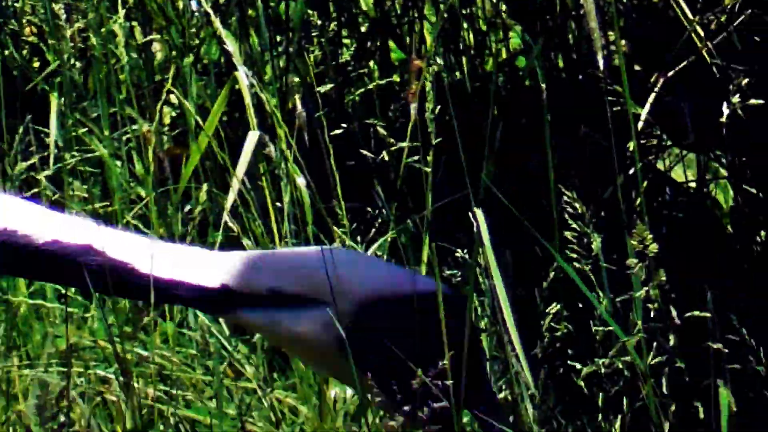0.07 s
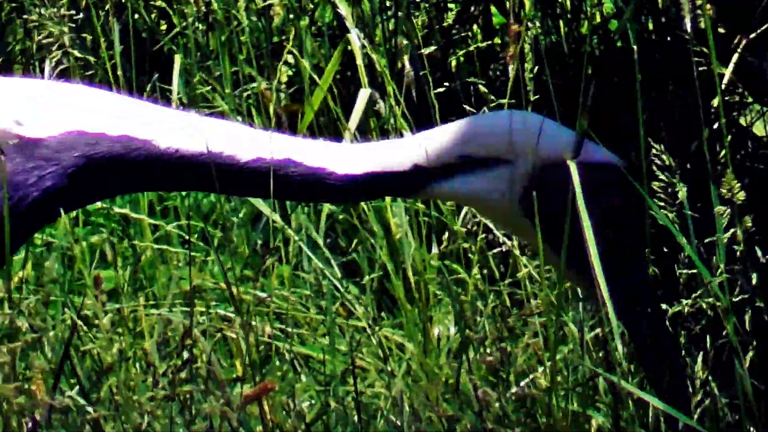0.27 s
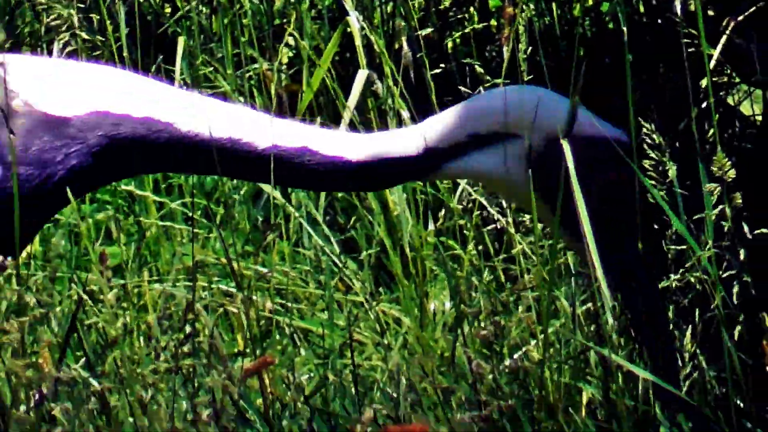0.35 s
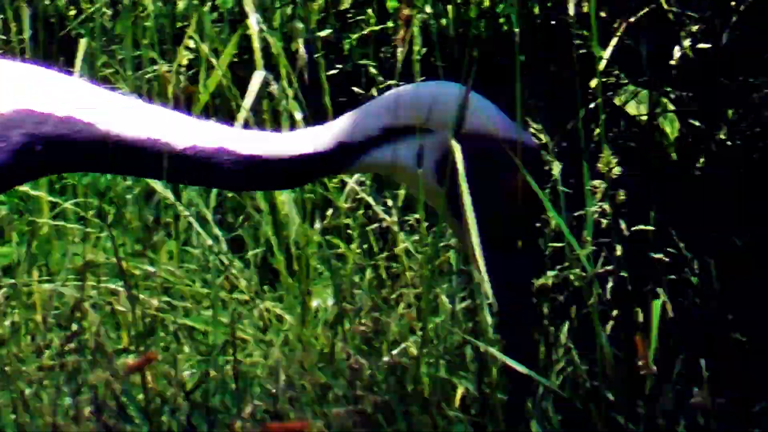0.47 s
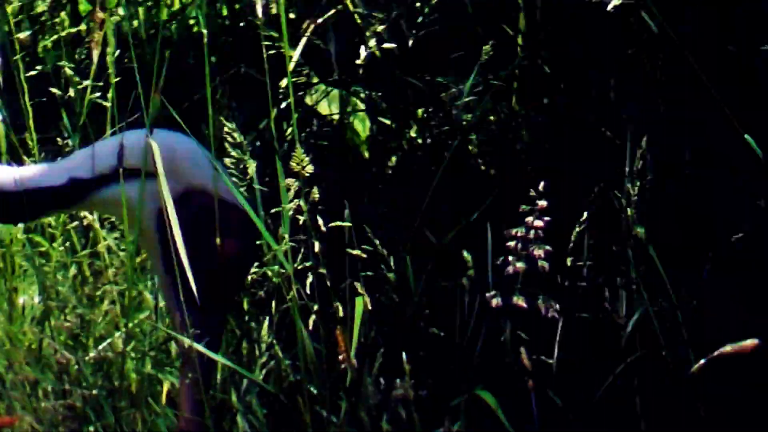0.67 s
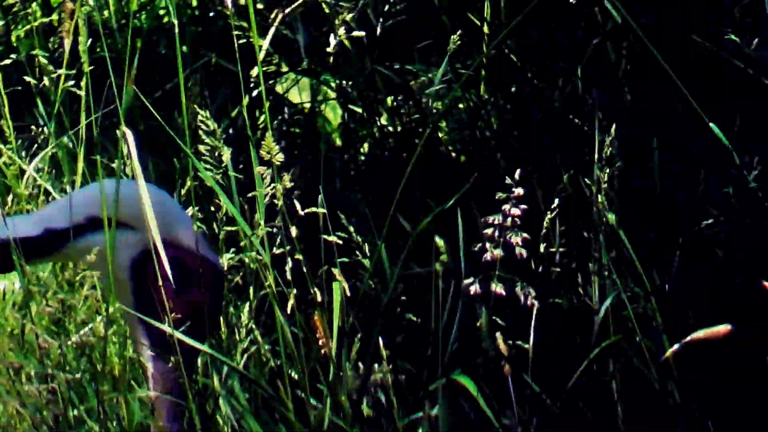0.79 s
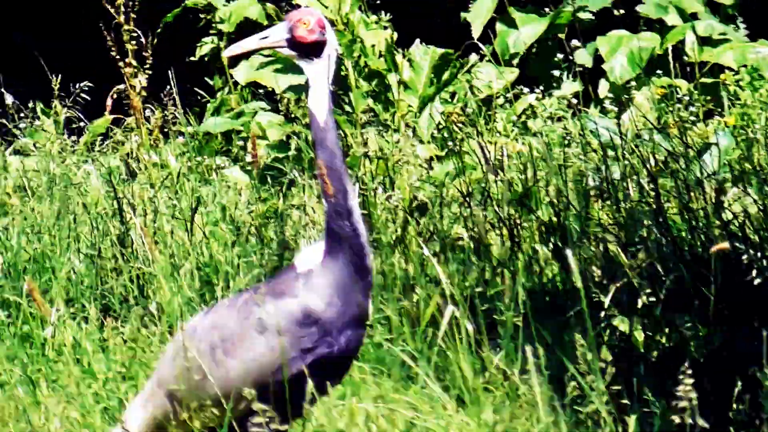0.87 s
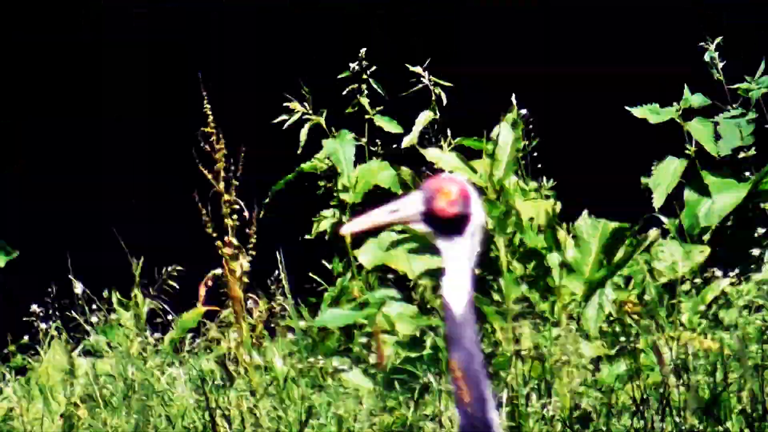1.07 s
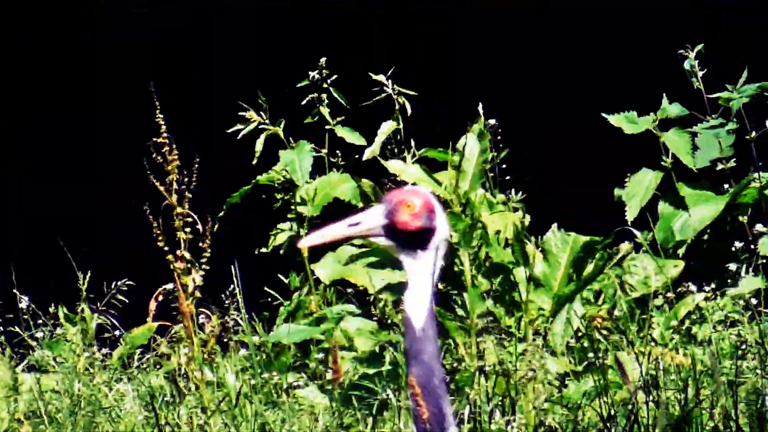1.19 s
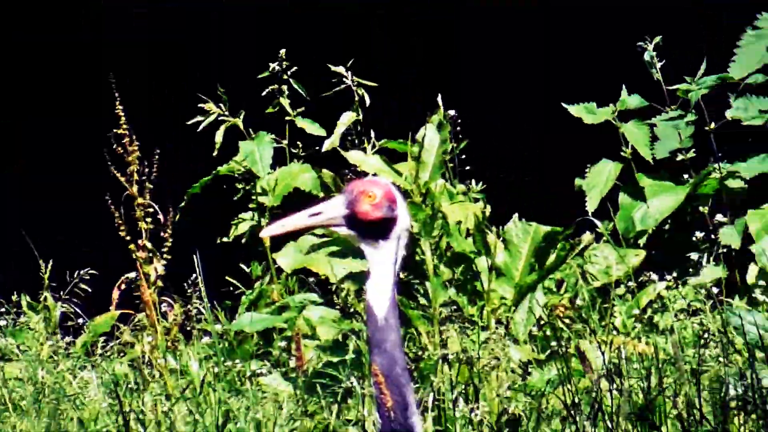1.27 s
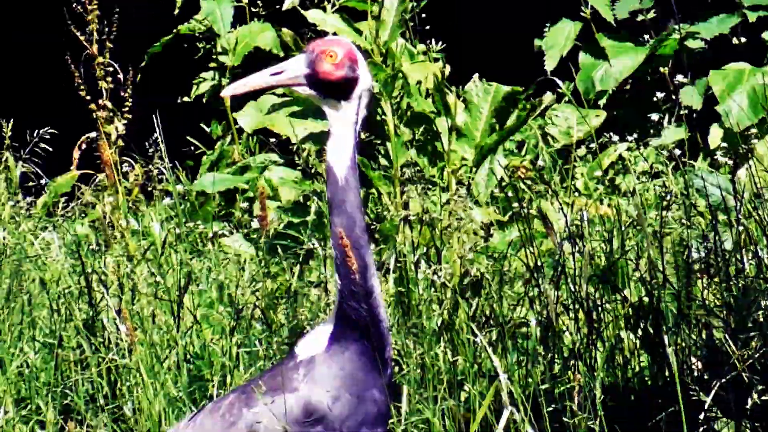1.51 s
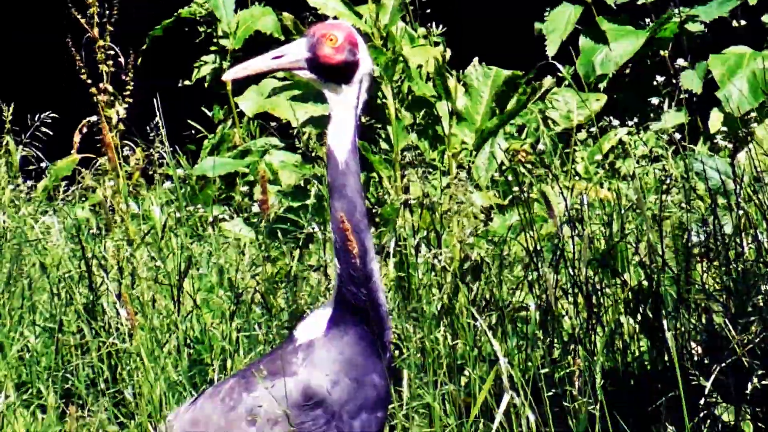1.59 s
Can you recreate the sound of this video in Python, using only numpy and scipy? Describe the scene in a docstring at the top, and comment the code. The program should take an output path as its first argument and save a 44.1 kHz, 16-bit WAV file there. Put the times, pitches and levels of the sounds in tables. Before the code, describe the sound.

A hand rubs on a camera body right at the microphone, a rough, hollow scraping with small plastic creaks, loudest from 0.2 to 0.5 seconds and gone by about 0.8. A very faint, thin lens motor whine then comes and goes, and distant birds chirp softly from 0.9 seconds on. A plastic control clicks once at 1.3 seconds. A steady, quiet meadow hush lies underneath throughout.

```python
"""A quiet meadow, where a hand shifts its grip on a camera. The skin sticks and slips over the housing,
which rings hollowly and creaks, and the rub dies away. A plastic control clicks once, and the lens
motor whines faintly in thin bands of noise. Distant birds chirp in short glides, smeared by the trees,
over a steady outdoor hush."""
import sys
import numpy as np
from scipy import signal
from scipy.fft import rfft, irfft
from scipy.io import wavfile
from scipy.ndimage import uniform_filter1d

SR = 44100
rng = np.random.default_rng(int(sys.argv[2]) if len(sys.argv) > 2 else 0)


def waveform_to_disk(signal):
    """Save audio, clipped to [-1, 1], as 16-bit WAV at the path in sys.argv[1]."""
    frames = np.transpose(np.atleast_2d(signal))
    scaled = np.clip(frames, -1, 1) * 32767
    samples = np.round(scaled).astype(np.int16)
    wavfile.write(sys.argv[1], SR, samples)


N = 72765

# slips of the grip: start_s, knock_db, chatter_hz, scratch_db
GRIP_SLIPS = [(.054, -19, 1500, -20), (.1675, -16.5, 687, -38), (.209, -10.5, 766, -18.5),
              (.229, -2, 560, -10.5), (.237, -2, 586, -10), (.2655, -9, 740, -26), (0.2705, 1, 950, 1.5),
              (.278, -1.5, 655, -11), (.301, -6, 634, -23), (.3115, -3.5, 618, -7), (.321, 1.5, 853, -4.5),
              (.3535, -0.5, 630, -7), (.3613, -3.5, 720, -1.5), (.3895, 1.5, 764, -3), (.3953, 0, 783, 4),
              (.4035, 4, 761, 1.5), (.409, -32, 700, -23), (.421, -22, 707, -14), (.438, -9, 745, -5),
              (.449, -9, 620, -14), (.4635, -8.5, 710, -16)]
CHATTER_S, KNOCK_DB = 0.0053, -23.5
SCRATCH_DB, SCRATCH_RISE_S, SCRATCH_FALL_S = -32, 0.001, 0.0038
# fader moves of the slide: time_s, hollow_rub_db, hiss_db
SLIDE_LEVELS = [(.16, -91, -84), (.203, -62, -62), (.218, -30.5, -48), (.29, -32, -44.5), (.38, -30.5, -42),
                (.41, -32, -35), (.47, -30.5, -41), (.55, -41.5, -51), (.63, -44, -56), (.73, -49.5, -57),
                (.85, -56.5, -69)]
GRAINS_PER_S, GRAIN_SPREAD_DB = 2500, 1
THRUM_HZ, THRUM_WAVER_HZ, THRUM_DB, THRUM_PEAK_S, THRUM_SWELL_S = 237, 5, -44.5, 0.355, 0.11
# hollow ring of the housing: pitch_hz, t60_s, level_db, drift_db_per_s
HOUSING_MODES = [(564.6, 0.24, -5, -50), (584, 0.12, -6.5, -31), (693.4, .11, -3.5, -22),
                 (713.5, 0.15, -6, 26), (778.4, 0.064, -8, 51), (708, 0.0072, 6.5, 24.5),
                 (876, 0.063, -8, 35), (980, 0.047, -19, -33), (1267, 0.09, -15, -6), (1426, 0.029, -14, 9)]
GRIP_MID_S, CONTACT_BAND_HZ = 0.34, (441, 1420)
# EQ of the scratching skin: frequency_hz, gain_db
SCRATCH_EQ = [(100, -33), (350, -18), (600, 5.5), (1000, 9.5), (1430, 4), (1700, -12), (2250, 4.5),
              (2850, -7.5), (3600, 2), (4300, 4.5), (4800, -5), (5900, 0), (7200, -6), (8600, -5.5),
              (10000, -14.5), (12000, -14), (15500, -30)]
# creaks of the plastic under the grip: start_s, level_db
CREAK_HITS = [(.114, -22), (.2727, -7.5), (.3232, -9.5), (.3957, 4.5), (.4062, -5)]
CREAK_DB, CREAK_RISE_S, CREAK_FALL_S = -27.5, .00025, 0.001
# EQ of a creak: frequency_hz, gain_db
CREAK_EQ = [(200, -9), (800, 17), (1300, 12), (1700, -11), (4200, 6.5), (5000, -6), (6000, -1), (8700, -12),
            (10500, -4), (15500, -18)]
# touch and snap of the control: start_s, level_db
CLICK_HITS = [(1.3037, -12.5), (1.3065, -7.5), (1.3087, -0.5), (1.3114, -16)]
CLICK_DB, CLICK_RISE_S, CLICK_FALL_S = -21, 0.00013, 0.00077
# EQ of the control's crack: frequency_hz, gain_db
CLICK_EQ = [(300, -22), (650, -11), (880, 2), (1350, 1), (1700, -9), (2400, -6), (3400, -6), (4400, -3),
            (5000, -7), (6500, 2), (8000, 0), (9500, -4), (11000, -12), (13000, -14), (15500, -15)]
# ring after the click: pitch_hz, t60_s, level_db
CLICK_RING = [(905, 0.046, -25.5), (1080, 0.023, -43), (1286, 0.052, -30)]
# whines of the lens motor: start_s, end_s, pitch_hz, width_hz, level_db
MOTOR_WHINES = [(0.743, .96, 4990, 895, -68), (0.953, 1.32, 8040, 300, -67), (1.114, 1.332, 6220, 302, -64),
                (1.358, 1.65, 7970, 362, -67.5), (1.38, 1.68, 6100, 300, -62.5),
                (1.443, 1.516, 6140, 110, -56)]
WHINE_FADE_S, WHINE_FLUTTER_DB = 0.032, 2.5
# distant chirps: start_s, length_s, start_pitch_hz, end_pitch_hz, level_db
BIRD_CHIRPS = [(0.868, 0.029, 3630, 3620, -59), (0.895, 0.065, 3240, 3200, -62),
               (0.977, 0.025, 3320, 3500, -63.5), (1.24, 0.033, 3650, 3790, -57),
               (1.33, .05, 4300, 4240, -68), (1.354, 0.032, 3710, 3750, -61.5),
               (1.367, 0.035, 4200, 4030, -66), (1.39, 0.03, 3510, 3350, -67),
               (1.429, 0.0413, 3725, 3455, -56.5), (1.492, .035, 3350, 3765, -55.5),
               (1.521, 0.11, 4170, 4230, -62), (1.633, 0.042, 3670, 3720, -51.5)]
CHIRP_WAVER_HZ, TREES_T60_S = 113.6, 0.22
# EQ of the outdoor hush: frequency_hz, gain_db
HUSH_EQ = [(25, -6.5), (55, 1), (90, 7.5), (118, 1), (200, 2), (380, -1.5), (640, 0), (900, -8.5),
           (1200, -10.5), (1600, -20.5), (2200, -17.5), (2800, -22.5), (3700, -19), (4400, -24),
           (5050, -30.5), (6300, -23.5), (7600, -23.5), (8800, -27.5), (12000, -29), (15500, -29)]
HUSH_DB, HUSH_WAVER_DB, HUSH_BASS_HZ = -43.5, 1, 680
# stereo image of the hush: frequency_hz, left_over_right_db, correlation
HUSH_IMAGE = [(60.3, -8.5, 0.25), (194, -5.5, .05), (363, -8, 0.35), (650, -1, 0.39), (1400, -1, 0.68),
              (3100, 0.5, 0.86), (6500, 0, 0.89), (14900, 0.5, 0.11)]
# the housing shakes the two microphones unequally: frequency_hz, left_over_right_db, left_lead_rad
HOUSING_IMAGE = [(60, -5, 2.4), (245, -12, 2.1), (527, -4.5, 1.97), (700, -4.5, 1.16), (1340, -1, 1.4),
                 (2420, 0.5, 0.53), (4460, -0.5, 0.13), (9000, 1, 0.11), (15000, 0, 0.4)]
# stereo width of scratches, creaks and clicks: frequency_hz, side_gain_db
SIDE_EQ = [(1000, -11), (4500, -15.5), (6500, -26), (9000, -2.5), (14000, -6)]
HIGH_CUT_HZ = 15900


def grip():
    """Slips and sliding grains ring the housing and scratch its surface."""
    body_gain = np.sqrt(np.sum(housing(taps([(GRIP_MID_S, 0)])) ** 2))
    rub = grains() * undb(curve(SLIDE_LEVELS, axis=1)) / body_gain
    slip_hits = taps([(start, db) for start, _, _, db in GRIP_SLIPS])
    scrapes = undb(SCRATCH_DB) * ring(slip_hits, burst(SCRATCH_RISE_S, SCRATCH_FALL_S))
    friction = np.hypot(scrapes, undb(curve(SLIDE_LEVELS, axis=2)))
    scratch, side = colour(np.array([grains(), grains()]) * friction, SCRATCH_EQ)
    return through_housing(housing(chatter() + rub) + thrum() + scratch) + widen(side)


def chatter():
    """In each slip the skin catches a few times in quick succession, swelling and letting go."""
    t, force = clock(), 0
    for start, db, hz, _ in GRIP_SLIPS:
        swell = np.sin(np.pi * np.clip((t - start) / CHATTER_S, 0, 1)) ** 2
        catches = np.cos(2 * np.pi * hz * (t - start))
        force = force + undb(KNOCK_DB + db) * 2 * swell / swell.sum() * catches
    return force


def grains():
    """Sliding skin makes dense tiny catches of uneven size."""
    caught = rng.random(N) < GRAINS_PER_S / SR
    polarity = np.sign(rng.standard_normal(N))
    size = undb(GRAIN_SPREAD_DB * np.minimum(rng.exponential(size=N), np.pi))
    return unit(caught * polarity * size)


def housing(force):
    """Soft skin drives the hollow modes; their mix changes as the grip moves along."""
    push = signal.sosfilt(signal.butter(2, CONTACT_BAND_HZ, "bandpass", fs=SR, output="sos"), force)
    moved_s, out = np.clip(clock() - GRIP_MID_S, -.2, .2), 0
    for hz, t60, db, drift in HOUSING_MODES:
        pole = np.exp((2j * np.pi * hz - np.log(1000) / t60) / SR)
        out = out + signal.lfilter([1], [1, -pole], push * undb(db + drift * moved_s)).imag
    return out


def thrum():
    """The whole body hums a low wavering note that swells and fades with the slide."""
    hz = THRUM_HZ + THRUM_WAVER_HZ * walk(56.3)
    swell = np.exp(-((clock() - THRUM_PEAK_S) / THRUM_SWELL_S) ** 2)
    level = undb(THRUM_DB + 2.2 * walk(30.5)) * swell
    return level * np.sqrt(2) * np.sin(2 * np.pi * np.cumsum(hz) / SR)


def creaks():
    """The plastic shell gives short bright snaps under the grip."""
    stress = undb(CREAK_DB) * ring(taps(CREAK_HITS), burst(CREAK_RISE_S, CREAK_FALL_S))
    snap, side = colour(np.sign(rng.standard_normal((2, N))) * stress, CREAK_EQ)
    return through_housing(snap) + widen(side)


def click():
    """A small plastic control is touched, snaps and settles."""
    force = taps(CLICK_HITS)
    contact = np.sign(rng.standard_normal((2, N))) * ring(force, burst(CLICK_RISE_S, CLICK_FALL_S))
    crack, side = undb(CLICK_DB) * colour(contact, CLICK_EQ)
    return through_housing(crack + ring(force, ringing(CLICK_RING))) + widen(side)


def lens_motor():
    """The motor's thin whines come and go, each a fluttering band of noise."""
    t, out = clock(), 0
    for start, end, hz, width, db in MOTOR_WHINES:
        gate = np.clip(np.minimum(t - start, end - t) / WHINE_FADE_S, 0, 1)
        level = undb(db + WHINE_FLUTTER_DB * walk(35.16)) * gate
        phase = 2 * np.pi * hz * t
        out = out + level * (walk(width) * np.cos(phase) + walk(width) * np.sin(phase))
    return out


def birds():
    """Short wavering glides, smeared by an equally loud echo from the trees."""
    t, song = clock(), 0
    for start, length, start_hz, end_hz, db in BIRD_CHIRPS:
        along = np.clip((t - start) / length, 0, 1)
        hz = start_hz + (end_hz - start_hz) * along + CHIRP_WAVER_HZ * walk(500)
        swell = np.sqrt(2 * np.abs(np.sin(np.pi * along)))
        song = song + undb(db) * swell * np.sin(2 * np.pi * np.cumsum(hz) / SR)
    trees = rng.standard_normal(N) * np.exp(-np.log(1000) * t / TREES_T60_S)
    return song + ring(song, trees / np.sqrt(np.sum(trees ** 2)))


def hush():
    """A steady bed of outdoor air: the treble is smooth, the bass wavers and leans right."""
    alike = np.clip(per_bin(HUSH_IMAGE, axis=2), -1, 1)
    pan = undb(per_bin(HUSH_IMAGE, axis=1) / 2)
    mid, side = (filtered(rng.standard_normal(N), np.sqrt(1 + sign * alike)) for sign in (1, -1))
    stereo = filtered(np.array([mid + side, mid - side]), np.array([pan, 1 / pan]))
    air = unit(colour(stereo, HUSH_EQ))
    bass = signal.sosfiltfilt(signal.butter(2, HUSH_BASS_HZ, fs=SR, output="sos"), air)
    return undb(HUSH_DB) * (air - bass + bass * undb(HUSH_WAVER_DB * walk(25.15)))


def through_housing(x):
    """The housing carries sound to the two microphones with different level and phase."""
    left = undb(per_bin(HOUSING_IMAGE, axis=1) / 2) * np.exp(.5j * per_bin(HOUSING_IMAGE, axis=2))
    return filtered(x, np.array([left, 1 / left]))


def widen(x):
    """A side signal for width, in opposite polarity left and right."""
    side = filtered(x, undb(per_bin(SIDE_EQ)))
    return np.array([side, -side])


def undb(db):
    """Decibels to gain."""
    return 10 ** (np.asarray(db) / 20)


def unit(x):
    """Scale to rms 1."""
    return x / np.sqrt(np.mean(x ** 2) + 1e-20)


def clock():
    """Time of every sample in seconds."""
    return np.arange(N) / SR


def curve(table, axis=1):
    """One column of a table as straight ramps in time."""
    rows = np.array(table)
    return np.interp(clock(), rows[:, 0], rows[:, axis])


def per_bin(table, axis=1):
    """One column of a table as straight ramps over log frequency."""
    rows = np.array(table)
    hz = np.maximum(np.fft.rfftfreq(2 * N, 1 / SR), 1)
    return np.interp(np.log(hz), np.log(rows[:, 0]), rows[:, axis])


def filtered(x, response):
    """Apply a frequency response."""
    return irfft(rfft(x, 2 * N) * response)[..., :N]


def colour(x, table):
    """Minimum-phase EQ with unit power gain."""
    cepstrum = irfft(np.log(unit(undb(per_bin(table)))))
    cepstrum[1:N] *= 2
    cepstrum[N + 1:] = 0
    return filtered(x, np.exp(rfft(cepstrum)))


def walk(rate_hz):
    """Smooth random wobble with rms 1."""
    hold = max(int(SR / rate_hz), 1)
    steps = np.repeat(rng.standard_normal(N // hold + 1), hold)
    return unit(uniform_filter1d(steps, hold)[:N])


def ringing(modes):
    """Ring of damped modes after one tap."""
    t = clock()
    return sum(undb(db) * np.sin(2 * np.pi * hz * t) * np.exp(-np.log(1000) * t / t60)
               for hz, t60, db in modes)


def ring(x, response):
    """Play a signal through an impulse response."""
    return signal.fftconvolve(x, response)[:N]


def taps(rows):
    """One impulse for each row of start_s, level_db."""
    out = np.zeros(N)
    for start, db in rows:
        out[int(start * SR)] += undb(db)
    return out


def burst(rise_s, fall_s):
    """Envelope with a quick attack and exponential decay, peak 1."""
    shape = (1 - np.exp(-clock() / rise_s)) * np.exp(-clock() / fall_s)
    return shape / shape.max()


def scene():
    """Handling noises up close, the meadow behind."""
    return grip() + creaks() + click() + lens_motor() + birds() + hush()


def record(dry):
    """A steep high cut trims the very top of the mix."""
    return signal.sosfilt(signal.ellip(10, .2, 80, HIGH_CUT_HZ, fs=SR, output="sos"), dry)


dry = scene()
out = record(dry)
waveform_to_disk(out)
```